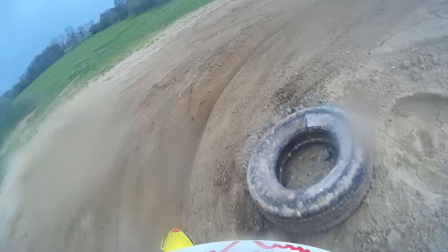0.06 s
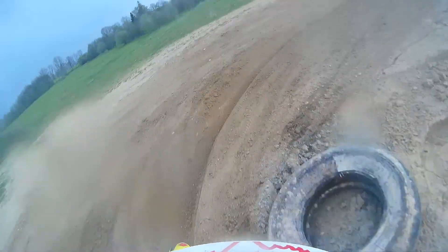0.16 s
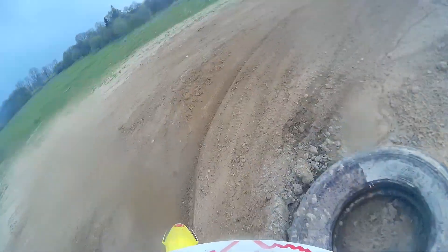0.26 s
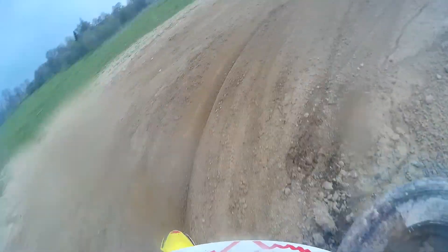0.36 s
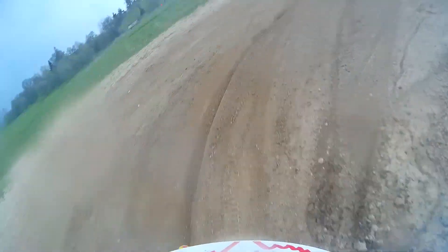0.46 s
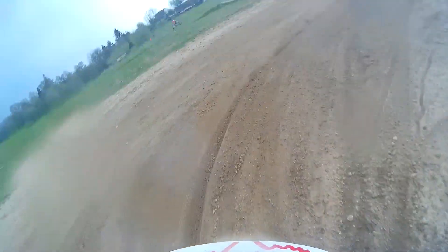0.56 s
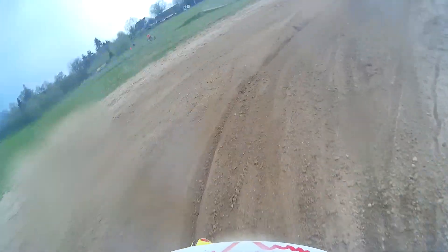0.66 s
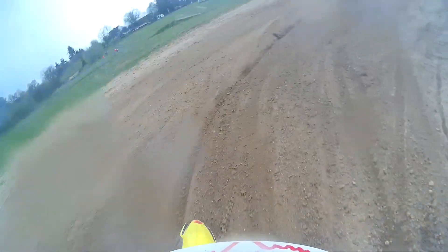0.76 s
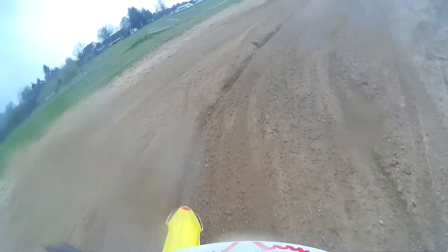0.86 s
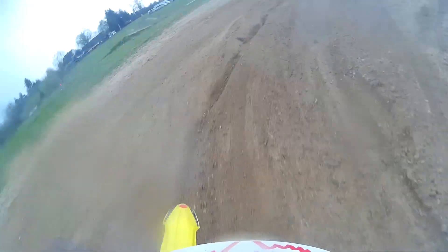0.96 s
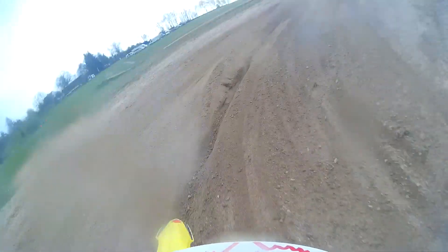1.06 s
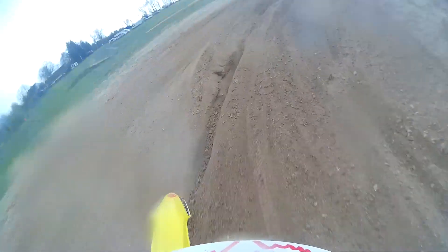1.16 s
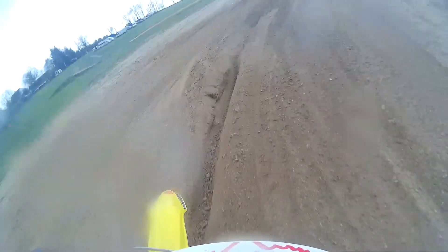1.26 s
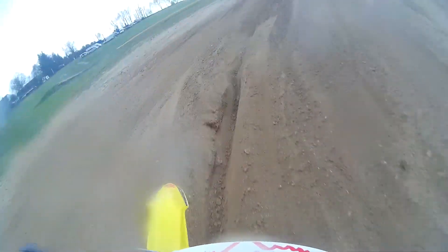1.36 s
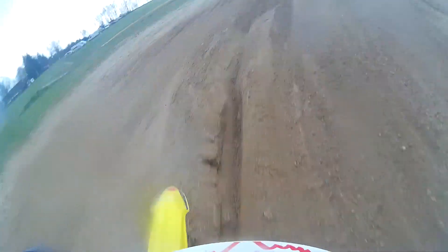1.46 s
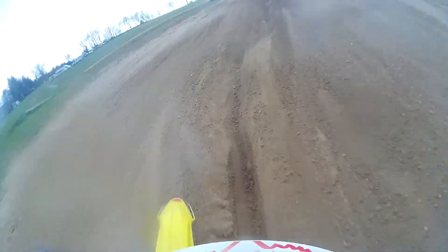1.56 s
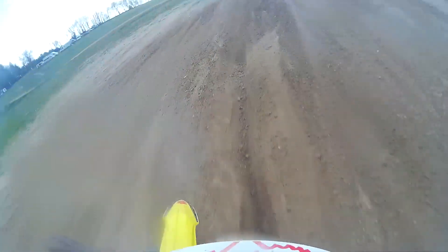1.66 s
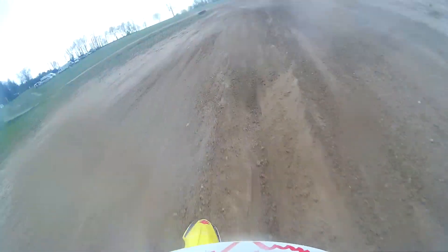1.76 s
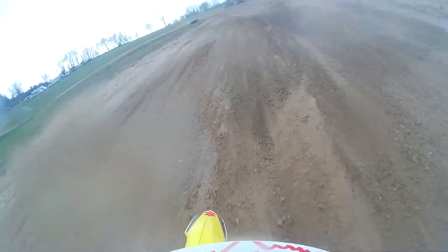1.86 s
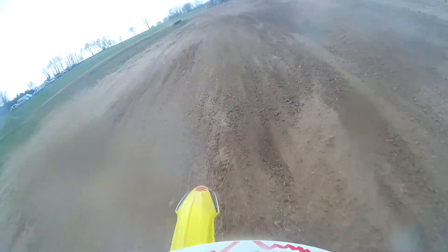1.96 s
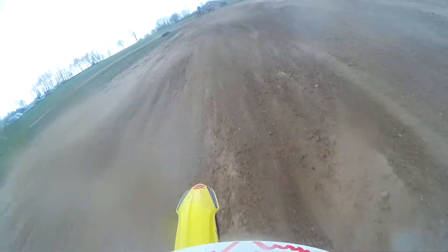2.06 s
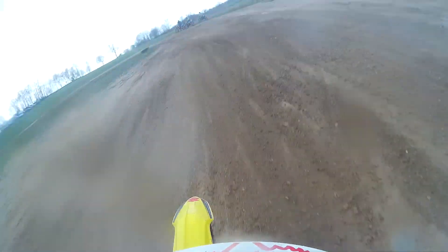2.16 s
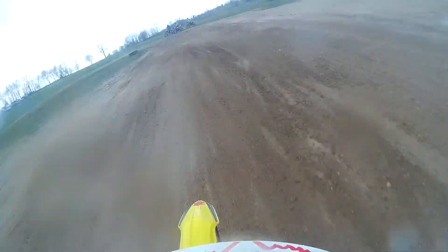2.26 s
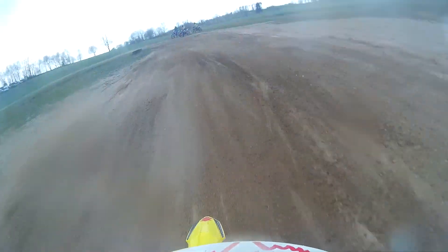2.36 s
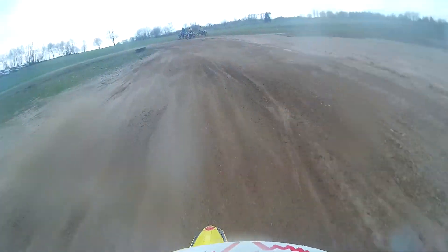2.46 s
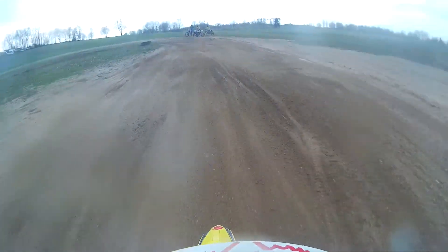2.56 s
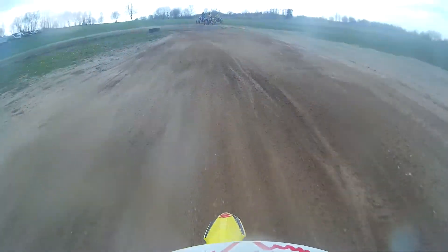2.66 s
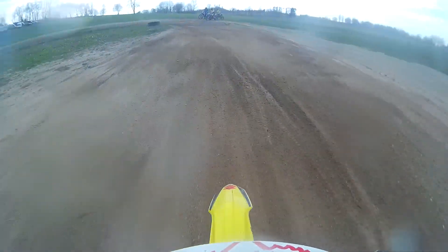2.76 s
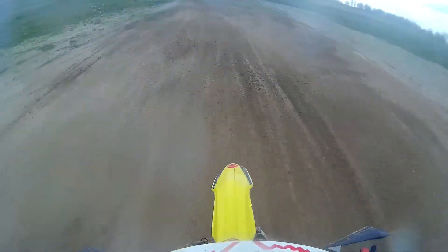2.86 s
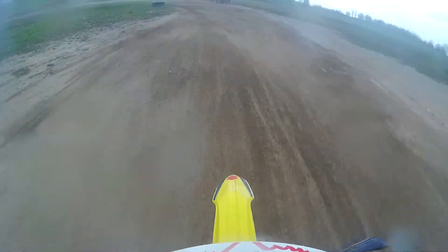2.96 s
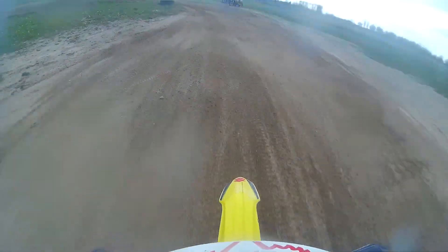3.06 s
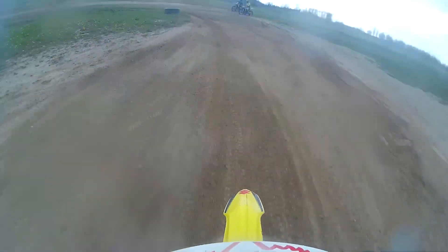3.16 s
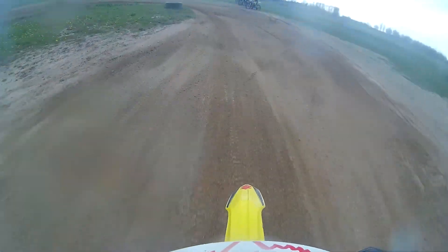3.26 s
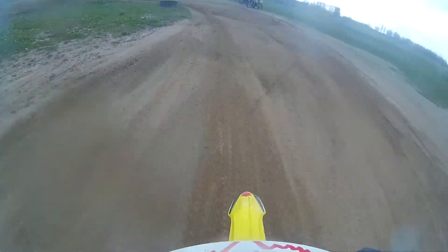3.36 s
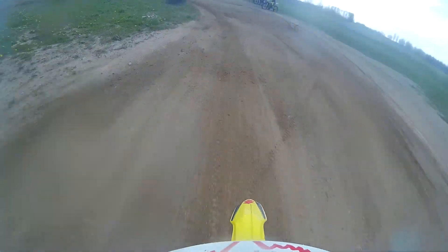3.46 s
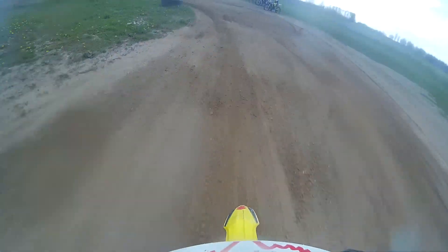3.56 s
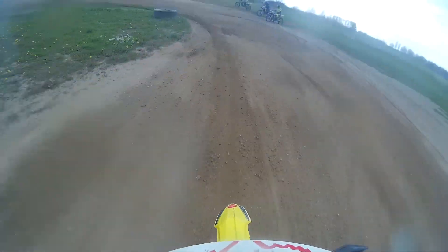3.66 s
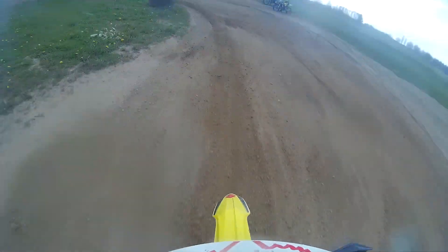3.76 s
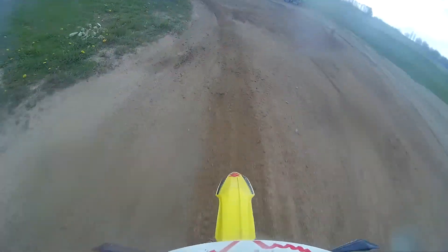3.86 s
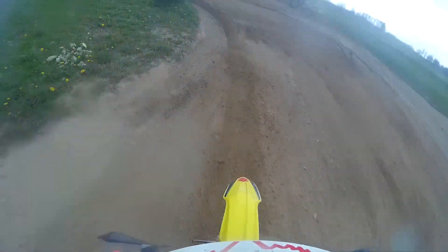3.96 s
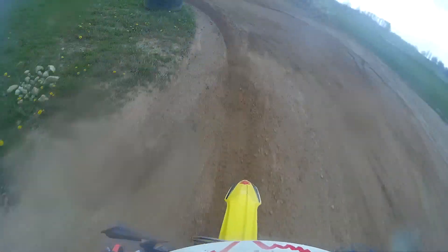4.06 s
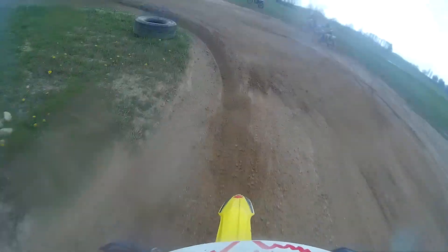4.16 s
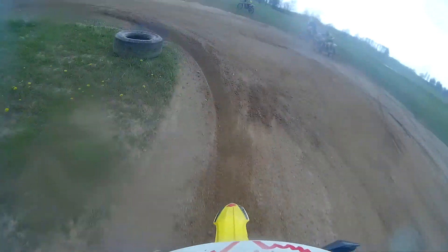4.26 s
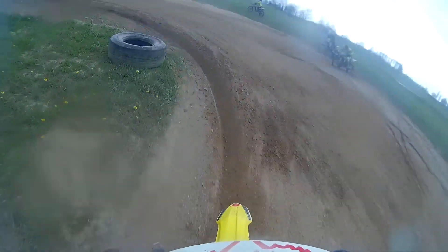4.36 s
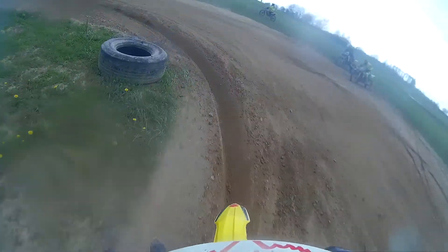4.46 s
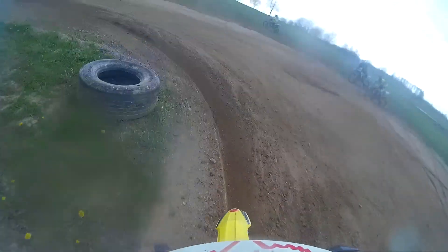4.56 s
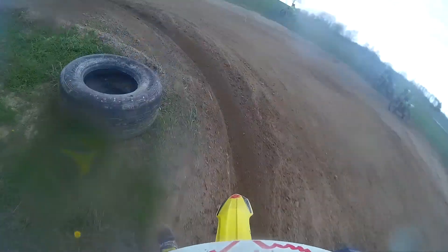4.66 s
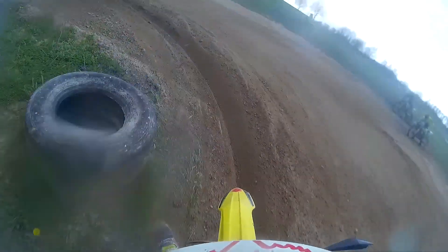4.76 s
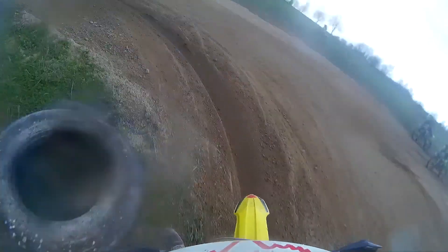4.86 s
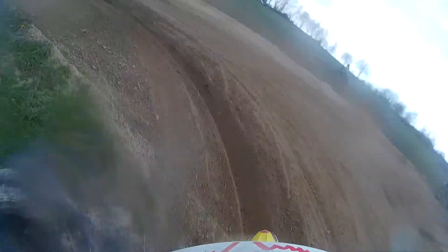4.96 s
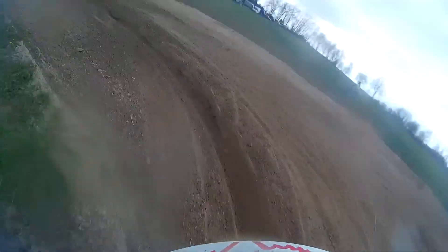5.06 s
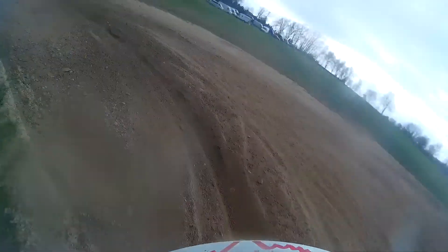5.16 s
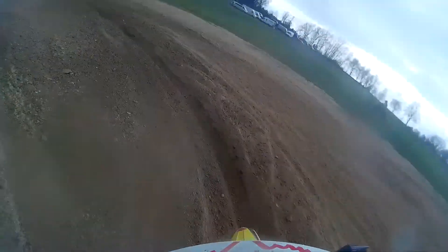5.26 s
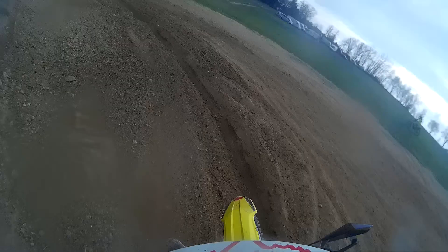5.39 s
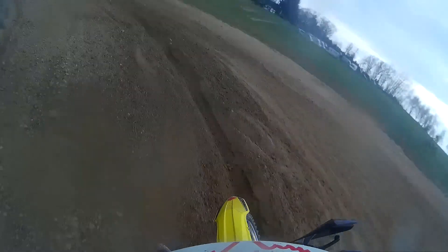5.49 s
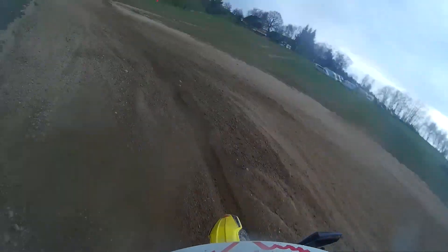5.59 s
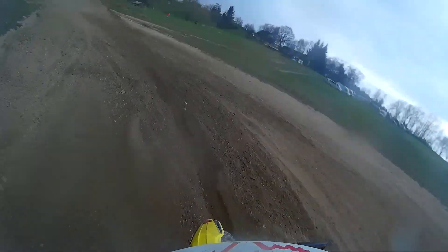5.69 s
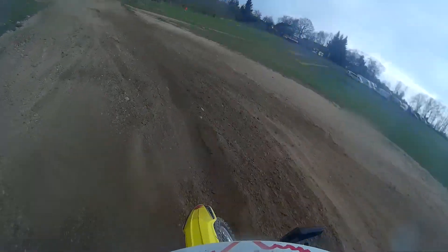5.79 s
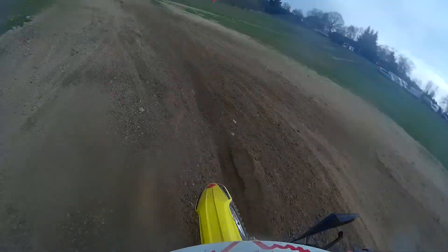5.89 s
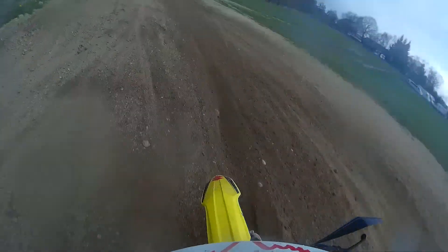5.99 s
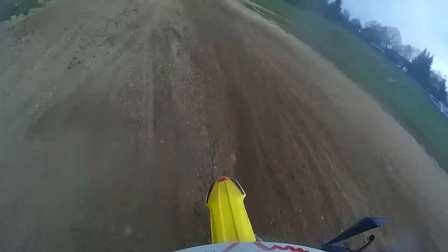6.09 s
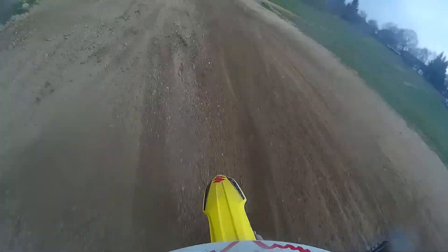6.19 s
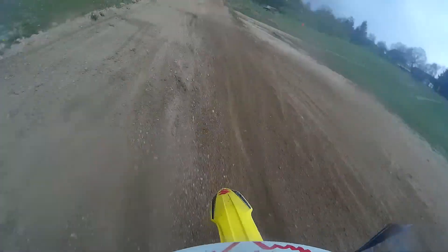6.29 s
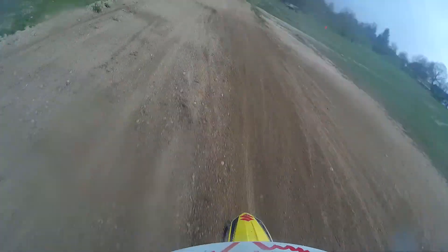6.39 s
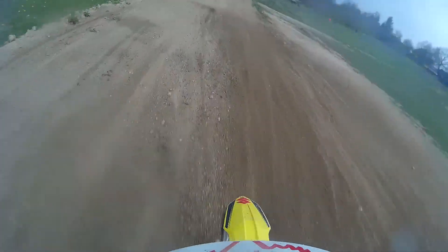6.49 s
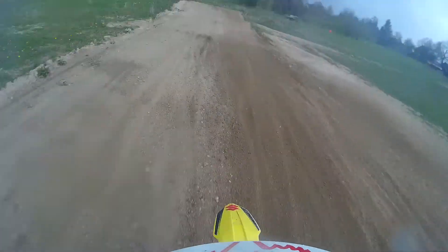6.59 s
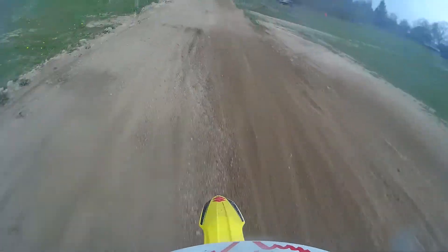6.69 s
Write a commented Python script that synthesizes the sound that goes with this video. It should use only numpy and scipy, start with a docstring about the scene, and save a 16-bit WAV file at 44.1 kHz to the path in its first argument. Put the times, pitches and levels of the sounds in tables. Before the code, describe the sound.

Onboard a four-stroke dirt bike: raspy throttle bursts, a shut-throttle lull with mechanical rattle, renewed barking bursts, small knocks and a hard late thump.

```python
"""A four-stroke single-cylinder dirt bike on a dirt track, heard from a camera in a housing on the rider.
The throttle opens out of one bend, shuts for the next and opens again; near the end one hard bump thumps.
Every firing excites the pipe's resonances and, under load, barks as a burst of turbulent gas; shut, the engine drones.
Throughout, valve train noise clatters, bumps ring the housing, grit ticks on it, wind rumbles and a whine holds."""
import sys
import numpy as np
from scipy import signal
from scipy.fft import rfft, irfft
from scipy.io import wavfile
from scipy.ndimage import uniform_filter1d

SR = 44100
rng = np.random.default_rng(int(sys.argv[2]) if len(sys.argv) > 2 else 0)


def master(y):
    """Save y as 16-bit WAV."""
    cut = np.clip(np.atleast_2d(y).T, -1, 1)
    pcm = np.round(cut * 32767)  # scale
    wavfile.write(sys.argv[1], SR, pcm.astype(np.int16))


N = 296793
TIME = np.arange(N) / SR  # s
FREQS = np.arange(N + 1) * SR / (2 * N) + 1e-6  # Hz, kept off zero for divisions and logarithms

# Wind and hiss spectrum. Each row: frequency in Hz, relative density in dB per Hz.
WIND_SPECTRUM = [(15, -6), (45, -18), (70, -19), (140, -16), (300, -30.5), (700, -32.5), (2500, -43.5),
                 (6000, -50), (15000, -50)]
# Electronic whine. Each entry: frequency in Hz.
WHINE_TONES_HZ = (8626, 8692)

# Modes of the camera housing. Each row: frequency in Hz, time to decay by 60 dB in seconds, relative level in dB.
HOUSING_MODES = [(145, 0.0063, -23), (281.4, 0.062, -6), (327, 0.017, 4), (498, 0.02, 3.5), (647, 0.02, -1),
                 (1010, 0.032, -4.5), (1145, 0.016, 7)]
# Bumps that knock the housing. Each row: start in seconds, peak in dB, contact time scale in ms.
KNOCK_EVENTS = [(0.8856, -18.5, 2.7), (1.107, -27, 2.9), (1.276, -23.5, 2.3), (1.380, -22.5, 3),
                (1.454, -26, 3.1), (1.465, -13, 6.8), (1.539, -12.5, 1.04), (1.613, -20.5, 5),
                (2.1991, -19.5, 1.5), (3.638, -22, 2.7), (3.7313, -28, 3.3), (4.112, -41, 4.7),
                (4.561, -30.5, 2.7), (4.927, -20, 3.2), (4.988, -29.5, 4.4), (5.097, -29.5, 4.7),
                (5.602, -31, 3.8), (5.7272, -21, 2.1), (6.2742, 5, 0.47), (6.334, -9, 4.1),
                (6.424, -26, 3.5)]
# Suspension hits that shake the rider. Each row: start in seconds, peak in dB.
THUD_EVENTS = [(0.489, -37), (0.996, -37), (1.46, -23.5), (2.128, -40), (2.934, -38), (3.629, -29),
               (6.061, -37), (6.259, -14.5), (6.558, -34)]
# Grit and sharp contacts on the housing. Each row: start in seconds, peak before the resonances in dB.
TICK_EVENTS = [(1.5368, -31.5), (1.891, -38), (2.889, -35), (3.415, -31), (3.582, -39), (3.746, -36.5),
               (3.8965, -38.5), (3.927, -36), (4.925, -39.5), (6.2739, -17.5), (6.333, -32)]
# Resonances of the ticks. Each row: frequency in Hz, width in Hz, relative level in dB.
TICK_RESONANCES = [(3350, 2900, 8), (5720, 440, 8.5), (7400, 2200, -6.5), (10600, 2800, 2.5),
                   (14000, 2500, -5)]

# Engine speed, flaring where the rear wheel spins on loose dirt. Each row: time in seconds, firings per second in Hz.
FIRING_RATE = [(0.0, 31.67), (0.4, 23.02), (0.61, 42.62), (0.8, 29.34), (1.21, 35.69), (1.26, 34.0),
               (1.61, 39.3), (1.74, 49.88), (2.2, 41.3), (2.48, 46.57), (2.59, 52.13), (2.73, 46.37),
               (3.18, 50.9), (3.3, 40.65), (3.72, 27.82), (5.1, 19.75), (5.28, 40.33), (5.4, 31.49),
               (5.63, 57.86), (5.78, 34.54), (6.07, 40.02), (6.16, 51.5), (6.24, 41.19), (6.3, 52.75),
               (6.56, 43.3), (6.73, 57.48)]
# Twists of the throttle, each with its own colour. Each row: opens in seconds, shuts in seconds,
# time to open in seconds, first opening 0-1, last opening 0-1, extra boom in dB, extra honk in dB, extra rasp in dB.
THROTTLE_TWISTS = [(0.34, .6, .04, 0.51, 0, 3, -4, 1.5), (0.474, 1.375, 0.26, 0.77, 0.76, -1.5, 3, 1),
                   (1.386, 1.788, 0.058, .84, 0.75, 3, 0, 1),
                   (1.713, 2.571, 0.064, 0.66, 0.97, 0.5, -0.5, -2.5),
                   (2.55, 3.11, 0.091, 0.88, 0.76, 1.5, 1.5, 1),
                   (5.156, 5.524, 0.045, 0.82, 0.82, -2.5, 0, 0.5),
                   (5.749, 6.178, 0.048, 0.84, 0.92, 2, -1.5, 0),
                   (6.213, 6.319, 0.055, 0.94, 0.88, 2, 4, 1),
                   (6.409, 6.676, .06, 0.69, 0.91, 4.5, 0, -0.5)]
# Resonances of the engine cases. Each row: frequency in Hz, width in Hz, relative level in dB.
CASE_RESONANCES = [(1127, 92, 9.5), (1330, 450, 1), (1836, 234, 2.5), (3113, 236, -8.5),
                   (3900, 2700, -23.5)]
# Harmonics of the drone against a shut throttle. Each row: multiple of the firing rate, relative level in dB.
DRONE_HARMONICS = [(3, -5), (4, 3.5), (5, -27), (6, -4)]
# Standing waves in the pipe at speed. Each row: multiple of the firing rate, relative level in dB.
PIPE_HARMONICS = [(3, -22), (4, -2.5), (5, -1.5), (6, -1.5), (7, -3.5), (8, -7.5)]
# Low resonances of the exhaust. Each row: frequency in Hz, width in Hz, relative level in dB.
BOOM_RESONANCES = [(103, 38, -18), (215, 50, 8), (257, 178, 7.5), (347.5, 75, 5)]
# Middle resonances of the exhaust. Each row: frequency in Hz, width in Hz, relative level in dB.
HONK_RESONANCES = [(390, 52, -3.5), (484.2, 42, 2.5), (622, 39, -5), (863, 570, -11.5)]
# Resonances of the bark of gas. Each row: frequency in Hz, width in Hz, relative level in dB.
BARK_RESONANCES = [(1155, 140, 12.5), (1400, 60, 7.5), (1593, 14, 6.5), (1794, 165, 4), (2028, 240, 4),
                   (1426, 3000, -2.5)]
# Resonances of the rasping edge. Each row: frequency in Hz, width in Hz, relative level in dB.
RASP_RESONANCES = [(2888, 104, 5.5), (3310, 440, -0.5), (3980, 1200, -10.5), (5470, 670, -10.5),
                   (7560, 590, -19.5), (10100, 990, -23.5)]
# How each exhaust voice follows the engine. Each law: level shut in dB, level wide open in dB,
# rise in dB per doubling of speed, exponent of the throttle law.
BOOM_THROTTLE_LAW = (-58.5, -37.5, 0, 1.66)
HONK_THROTTLE_LAW = (-66, -42, 1.3, 0.7)
BARK_THROTTLE_LAW = (-66, -31, 2, 1.2459)

CRUISE_HZ = 40  # firings per second at which the speed laws are referred
RELEASE_S = 0.14  # decay time of the gas flow after the throttle shuts
# drone of engine braking: level at cruising speed, rise with speed, and change when the throttle is wide open
DRONE_DB, DRONE_DB_PER_OCTAVE, DRONE_MUTE_DB = -49, 16, -29
CRANK_DB, CRANK_DB_PER_OCTAVE = -54.5, 7.5  # crank hum at cruising speed, and its rise with speed
TOP_HZ = 15700  # upper band limit of the camera


def undb(db):
    """Amplitude gain is ten to the power of decibels over twenty."""
    return 10 ** (np.asarray(db) / 20)


def level(x, db):
    """Mean power fixes the scale: the signal is brought to an rms level in dB."""
    return x * undb(db) / np.sqrt(np.mean(x ** 2))


def noise():
    """White noise: independent samples carry equal power at all frequencies."""
    return rng.standard_normal(N)


def walk(rate):
    """Averaging stepped random values gives a smooth drift, near unit spread, at a rate in Hz."""
    step = int(SR / rate)
    stairs = np.repeat(rng.standard_normal(N // step + 1), step)
    return level(uniform_filter1d(stairs, step)[:N], 0)


def shape(x, response):
    """A linear filter multiplies the spectrum by its response over FREQS."""
    return irfft(rfft(x, 2 * N) * response)[:N]


def ring(x, modes, low_hz, high_hz, alternate=True, order=3):
    """Damped resonators add between two steep skirts; alternating signs give the delay of a pipe."""
    signs = (-1) ** (np.arange(len(modes)) * alternate)
    body = 0
    for sign, (hz, width, db) in zip(signs, modes):
        detuning = (FREQS ** 2 - hz ** 2) / (FREQS * width)
        body = body + sign * undb(db) / (1 + 1j * detuning)
    skirts = signal.butter(order, [low_hz, high_hz], "band", fs=SR, output="sos")
    return signal.sosfilt(skirts, shape(x, body))


def add(out, s, sound, db):
    """Superposition: a sound scaled to a peak in dB is summed in at a time in seconds."""
    i = int(s * SR)
    out[i:i + len(sound)] += (sound * undb(db) / np.abs(sound).max())[:N - i]


def air():
    """Broadband flow noise: gusty wind below 900 Hz over a steady hiss, with a thin electronic whine."""
    hz, db = np.transpose(WIND_SPECTRUM)
    colour = undb(np.interp(np.log(FREQS), np.log(hz), db))
    low = FREQS < 900
    gusts = undb(1.7 * walk(12))
    rumble = shape(noise() * gusts, colour * low)
    hiss = shape(noise(), colour * ~low)
    whine = 0
    for tone_hz in WHINE_TONES_HZ:
        drifting_hz = tone_hz + 7 * walk(60)
        whine = whine + np.sin(2 * np.pi * np.cumsum(drifting_hz) / SR)
    return level(rumble + hiss, -52) + level(whine, -82)


def grit():
    """A very short contact is broadband: each click of decaying noise excites the tick resonances."""
    clicks, t = np.zeros(N), TIME[:SR // 4]
    decay = np.exp(-t / 0.001) + undb(-5.5) * np.exp(-t / 0.0024)
    for s, db in TICK_EVENTS:
        add(clicks, s, rng.standard_normal(len(t)) * decay, db)
    return undb(-4) * ring(clicks, TICK_RESONANCES, low_hz=1750, high_hz=14700)


def thuds():
    """A mass on springs answers a hit with damped low oscillations, here with a shudder of noise."""
    out, t = np.zeros(N), TIME[:SR // 4]
    fast_sway = np.sin(2 * np.pi * 46 * t) * np.exp(-t / 0.047)
    slow_sway = undb(-4) * np.sin(2 * np.pi * 26 * t) * np.exp(-t / 0.028)
    for s, db in THUD_EVENTS:
        shudder = ring(noise(), [(74, 230, 0)], low_hz=61, high_hz=229)[:len(t)]
        add(out, s, fast_sway + slow_sway + level(shudder, -16.5) * np.exp(-t / 0.052), db)
    return out


def knocks():
    """Impulse response convolved with force: a shorter push excites higher modes of the housing."""
    out, t = np.zeros(N), TIME[:SR // 4]
    housing = sum(undb(db - 60 * t / t60) * np.cos(2 * np.pi * hz * t) for hz, t60, db in HOUSING_MODES)
    for s, db, contact_ms in KNOCK_EVENTS:
        x = 1000 * t / contact_ms
        push = x ** 2 * np.exp(-5.5 * x)
        add(out, s, -signal.fftconvolve(housing, push)[:len(t)], db)
    return out


def clatter(turns, hz):
    """Random impacts of valve train, chain and gears excite the cases, more strongly with engine speed."""
    taps = noise() * undb(2.66 * walk(260) + 0.37 * np.cos(2 * np.pi * turns))
    rattle = ring(taps, CASE_RESONANCES, low_hz=720, high_hz=6100)
    return level(rattle, -60) * (hz / 23) ** 1.97  # -60 dB belongs to 23 firings per second


def harmonics(turns, hz, orders, peak_hz, width_hz, lift_db, waver_db):
    """A periodic source has harmonics, and each swells as it crosses a resonance."""
    out = 0
    for k, db in orders:
        lift = lift_db / (1 + ((k * hz - peak_hz) / width_hz) ** 2)
        gain = undb(db + lift + waver_db * walk(16))
        out = out + gain * np.sin(2 * np.pi * k * turns + k ** 2)
    return level(out, 0)


def hum(turns, hz, opening):
    """A four-stroke's crank turns twice a firing and hums; a shut throttle adds the drone of engine braking."""
    octaves = np.log2(hz / CRUISE_HZ)
    crank_gain = undb(CRANK_DB + CRANK_DB_PER_OCTAVE * octaves + walk(14))
    crank = crank_gain * np.sqrt(2) * np.sin(2 * np.pi * 2 * turns)
    drone = harmonics(turns, hz, DRONE_HARMONICS, peak_hz=150, width_hz=75, lift_db=10, waver_db=3.5)
    drone_gain = undb(DRONE_DB + DRONE_DB_PER_OCTAVE * octaves + DRONE_MUTE_DB * opening)
    return crank + drone_gain * drone


def twist(opens, shuts, attack_s, first, last):
    """Flow follows the valve: a linear opening, a slow lean, and an exponential decay once shut."""
    attack = np.clip((TIME - opens) / attack_s, 0, 1)
    hold = np.interp(TIME, [opens + attack_s, shuts], [first, last])
    release = np.exp(-np.maximum(TIME - shuts, 0) / RELEASE_S)
    return np.clip(attack * hold * release, 0, 1)


def throttle():
    """The widest twist sets the opening; a weighted mean gives the extra boom, honk and rasp in dB."""
    each = np.array([twist(*row[:5]) for row in THROTTLE_TWISTS])
    colours = np.array([row[5:] for row in THROTTLE_TWISTS])
    weights = each ** 4  # favours the widest twist
    return each.max(axis=0), colours.T @ weights / (weights.sum(axis=0) + 0.001)


def loudness(law, opening, hz):
    """Radiated level rises with throttle opening and with octaves of engine speed."""
    shut_db, open_db, db_per_octave, bend = law
    return undb(shut_db + (open_db - shut_db) * opening ** bend + db_per_octave * np.log2(hz / CRUISE_HZ))


def since(turns, hz, lead_ms):
    """Phase locates the nearest firing; its number and the ms since its gas burst are returned."""
    cycle = np.floor(turns + 0.5)
    return cycle.astype(int), 1000 * (turns - cycle) / hz + lead_ms


def pulses(turns, share, scatter_db, jitter_ms):
    """An impulse train, slightly irregular in time and size, with its power even over engine speed."""
    when = np.interp(np.arange(1, int(turns[-1])) + share, turns, TIME)
    chance = rng.standard_normal((len(when), 2))
    size = undb(scatter_db * chance[:, 0]) * np.sqrt(np.abs(np.gradient(when)))
    at = np.clip((when + jitter_ms * chance[:, 1] / 1000) * SR, 0, N - 1)
    return level(np.bincount(at.astype(int), size, N), 0)


def puff(turns, hz, lead_ms, rise_ms, fall_ms, rest_db, scatter_db):
    """Unsteady flow modulates turbulence: noise swells as the valve opens, then decays to a floor."""
    cycle, ms = since(turns, hz, lead_ms)
    gate = np.exp(-(np.minimum(ms, 0) / rise_ms) ** 2 - np.maximum(ms, 0) / fall_ms)
    size = undb(scatter_db * rng.standard_normal(N // 100))[cycle]
    return level(noise() * (gate * size + undb(rest_db)) / np.sqrt(hz), 0)


def yelp(turns, hz, lead_ms, width_ms, centre_hz, glide, jitter_ms):
    """A jet tone sings for a few cycles a firing, mostly rising in pitch (glide: mean share per ms)."""
    cycle, ms = since(turns, hz, lead_ms)
    late, pitch, bend, size = rng.standard_normal((N // 100, 4))[cycle].T
    ms = ms + jitter_ms * late
    start_hz = centre_hz * (1 + 0.05 * pitch)
    bent_ms = ms + glide * (1 + 0.9 * bend) * ms ** 2 / 2
    phase = 2 * np.pi * start_hz * bent_ms / 1000
    strength = undb(1.5 * size) / np.sqrt(hz)
    return level(np.sin(phase) * np.exp(-(ms / width_ms) ** 2) * strength, 0)


def pipe(turns, hz, opening, boom_db, honk_db):
    """Blowdown pulses excite the pipe's boom and honk; at speed the putts merge into standing waves."""
    merged = np.clip((hz - 31) / 13, 0, 0.96)  # power share of the steady tone
    blowdown = pulses(turns, share=-0.1457, scatter_db=1.36, jitter_ms=0.074)
    flow = puff(turns, hz, lead_ms=1.3, rise_ms=7.8, fall_ms=12.5, rest_db=-37, scatter_db=1.5)
    stumble = undb(-1.5) * (CRUISE_HZ / hz) ** 2  # slow firings burn less evenly
    thump = ring(blowdown + stumble * flow, BOOM_RESONANCES, low_hz=52, high_hz=410)
    putts = level(thump / np.hypot(1, stumble), 0)
    tone = harmonics(turns, hz, PIPE_HARMONICS, peak_hz=260.6, width_hz=30, lift_db=7, waver_db=2.95)
    boom = np.sqrt(1 - merged) * putts + np.sqrt(merged) * tone
    breathy = undb(-1) * stumble
    call = ring(blowdown + breathy * flow, HONK_RESONANCES, low_hz=371, high_hz=1110)
    honk = level(call / np.hypot(1, breathy), 0)
    boom_gain = loudness(BOOM_THROTTLE_LAW, opening, hz) * undb(boom_db)
    honk_gain = loudness(HONK_THROTTLE_LAW, opening, hz) * undb(honk_db)
    return boom_gain * boom + honk_gain * honk


def gas(turns, hz, opening, rasp_db):
    """Escaping gas radiates jet tone and turbulence: under load each firing barks with a rasping edge."""
    song = yelp(turns, hz, lead_ms=0.9, width_ms=1.8, centre_hz=1540, glide=0.1, jitter_ms=0.12)
    jet = puff(turns, hz, lead_ms=2.3, rise_ms=1.5, fall_ms=4, rest_db=-12, scatter_db=1)
    bark = ring(song + undb(5.5) * jet, BARK_RESONANCES, low_hz=932, high_hz=2336, alternate=False, order=4)
    spray = puff(turns, hz, lead_ms=1.5, rise_ms=1.2, fall_ms=3.8, rest_db=-28, scatter_db=2.2)
    rasp = ring(spray, RASP_RESONANCES, low_hz=2430, high_hz=12100)
    zing = ring(spray, [(4145, 260, 0)], low_hz=3400, high_hz=5320)
    # a slow, labouring engine takes bigger gulps, so its edge is harder
    labour = np.log2(CRUISE_HZ / np.maximum(hz, 30))
    edge = level(rasp, -18.5) * undb(4.9 * labour) + level(zing, -27) * undb(12 * labour)
    return loudness(BARK_THROTTLE_LAW, opening, hz) * (level(bark, 0) + undb(rasp_db) * edge)


def scene():
    """Superposition of air, bumps and engine at the camera."""
    s, rate = np.transpose(FIRING_RATE)
    hz = np.interp(TIME, s, rate)
    turns = np.cumsum(hz) / SR - 0.2  # phase counted in firings
    opening, (boom_db, honk_db, rasp_db) = throttle()
    bumps = knocks() + thuds() + grit()
    exhaust = pipe(turns, hz, opening, boom_db, honk_db) + gas(turns, hz, opening, rasp_db)
    engine = clatter(turns, hz) + hum(turns, hz, opening) + exhaust
    return (air() + bumps + engine)[None]


def record(dry):
    """Saturation and band limit: the camera rounds the strongest peaks and cuts the top."""
    ceiling = 0.75
    rounded = ceiling * np.tanh(dry / ceiling)
    low_pass = signal.ellip(8, 0.2, 80, TOP_HZ, fs=SR, output="sos")
    return signal.sosfilt(low_pass, rounded)


dry = scene()
out = record(dry)
master(out)
```